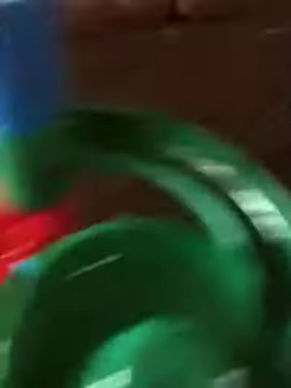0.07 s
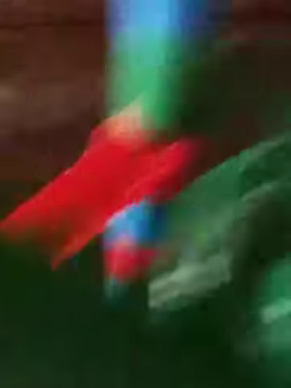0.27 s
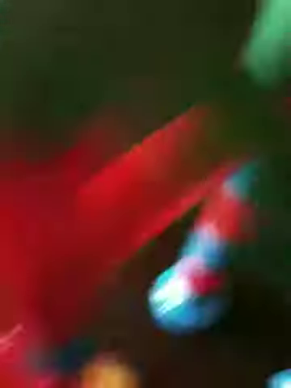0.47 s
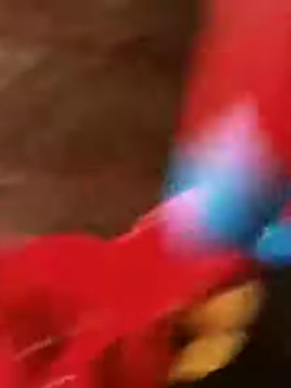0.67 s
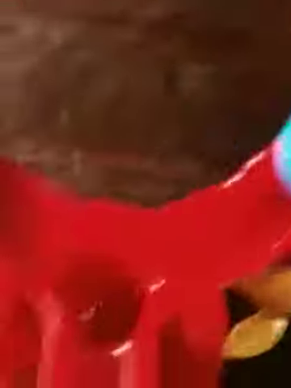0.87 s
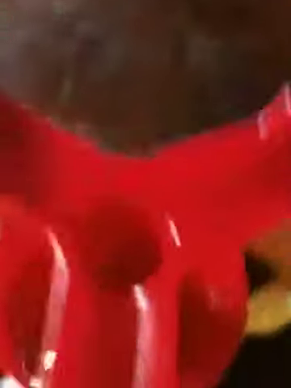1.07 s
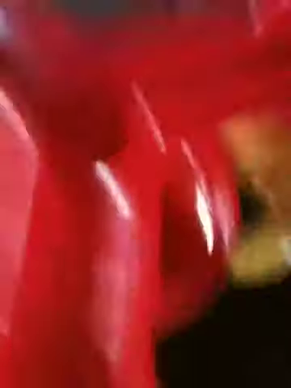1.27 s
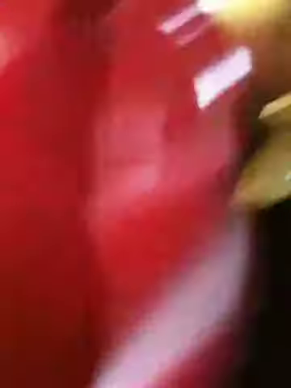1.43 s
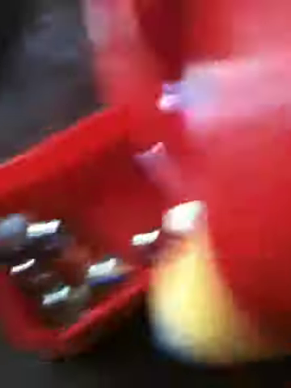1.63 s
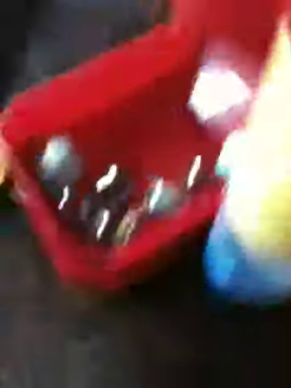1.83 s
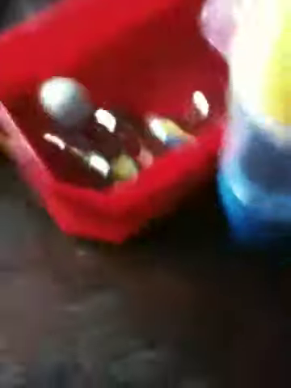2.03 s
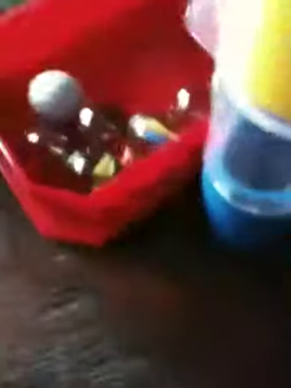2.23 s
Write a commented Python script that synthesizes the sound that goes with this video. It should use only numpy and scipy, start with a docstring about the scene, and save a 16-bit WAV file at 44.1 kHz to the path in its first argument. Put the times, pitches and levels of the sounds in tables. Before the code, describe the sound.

Marbles clack sharply along a plastic marble run, drop into a chute and roll briefly, then crash into a tray of other marbles. A few light clicks follow, heard close by in a quiet room.

```python
"""A knock's ring fades, then marbles roll and knock along the upper track of a plastic marble run,
close by in an ordinary room. They drop into a chute, roll along it and crash into a tray of marbles;
a few last clicks follow. Rolling is a stream of tiny bumps stirring the plastic's resonances.
Each knock is a glassy crack, then the struck part rings. The hardest knocks overload the microphone."""
import sys
import numpy as np
from scipy import signal
from scipy.io import wavfile

SR = 44100
rng = np.random.default_rng(int(sys.argv[2]) if len(sys.argv) > 2 else 0)


def persist_wave(psi):
    """Save psi, clipped to +-1, as 16-bit WAV."""
    counts = np.round(np.clip(psi, -1, 1) * 32767).astype(np.int16)
    wavfile.write(sys.argv[1], SR, np.atleast_2d(counts).T)


N = 105840
TIME_S = np.arange(N) / SR
EDGES_HZ = np.geomspace(40, 18000, 25)
CENTRES_HZ = np.sqrt(EDGES_HZ[1:] * EDGES_HZ[:-1])


def from_db(db):
    """Decibels to gain."""
    return 10 ** (np.asarray(db) / 20)


def unit_rms(x):
    """Scale to unit power."""
    return x / np.sqrt(np.mean(x ** 2) + 1e-20)


def at_hz(points, hz):
    """Read a table on a log-frequency axis."""
    points_hz, values = np.transpose(points)
    return np.interp(np.log(hz), np.log(points_hz), values)


def butterworth(x, hz, kind, order=2):
    """Causal Butterworth filter."""
    return signal.sosfilt(signal.butter(order, hz, kind, fs=SR, output="sos"), x)


def noise_bands():
    """White noise in roughly third-octave bands, neighbours uncorrelated."""
    white = rng.standard_normal((2, N))
    return np.array([butterworth(white[k % 2], EDGES_HZ[k:k + 2], "band")
                     for k in range(len(CENTRES_HZ))])


def band_gains(spectrum):
    """Gains that give the noise bands this spectrum at unit power."""
    gain = from_db(at_hz(spectrum, CENTRES_HZ))
    return gain / np.sqrt(np.sum(gain ** 2 * np.diff(EDGES_HZ)) * 2 / SR)


def decays(t60_s, t):
    """One exponential envelope per decay time."""
    return np.exp(-np.log(1000) * t / np.asarray(t60_s)[:, None])


# Background spectrum: freq_hz, relative_density_db
BACKGROUND_SPECTRUM = [(30, -22), (100, -4), (190, 1.5), (400, -6.5), (1000, -13.5), (4000, -19),
                       (15000, -23)]


def background(level_db):
    """Faint steady noise, strongest in the bass."""
    return from_db(level_db) * band_gains(BACKGROUND_SPECTRUM) @ noise_bands()


def rolling(envelope, resonances, bumps_per_s=7600, spread_db=1, flutter_db=1.6, flutter_hz=45):
    """A rolling marble meets many tiny soft bumps, which stir the plastic's resonances."""
    hits = rng.random(N) < bumps_per_s / SR
    bumps = hits * rng.standard_normal(N) * from_db(spread_db * rng.standard_normal(N))
    soft_bumps = butterworth(bumps + 1e-18, 6500, "low")
    rumble = np.zeros(N)
    for k, (hz, width_hz, gain_db) in enumerate(resonances):
        resonator = signal.iirpeak(hz, hz / width_hz, fs=SR)
        rumble += (-1) ** k * from_db(gain_db) * signal.lfilter(*resonator, soft_bumps)
    flutter = unit_rms(butterworth(rng.standard_normal(N), flutter_hz, "low"))
    level_db = np.interp(TIME_S, *np.transpose(envelope), left=-np.inf, right=-np.inf)
    return unit_rms(rumble) * from_db(level_db + flutter_db * flutter)


# Fading ring, then rolling, on the track: time_s, level_db
TRACK_ENVELOPE = [(0, -29), (.04, -40), (.1, -46), (.13, -39.5), (.16, -48), (.2, -58), (.3, -35),
                  (.42, -34.5), (.46, -64)]
# Track resonances: freq_hz, width_hz, gain_db
TRACK_RESONANCES = [(205, 36, -4.5), (781, 48, -3.5), (1150, 47, -6.5), (1434, 70, -2.5), (2030, 190, 0),
                    (2327, 107.5, -1.5), (2830, 390, -4.5), (3230, 130, -2.5), (3960, 980, -13)]


def track_ring_and_roll():
    """A knock's ring fades at the start, then rolling stirs the track in uneven surges."""
    return rolling(TRACK_ENVELOPE, TRACK_RESONANCES)


def ring_up(hz, t, rise_cycles=1.18):
    """The plastic rings up over a few cycles, so the treble arrives first."""
    return 1 - np.exp(-t * hz[:, None] / rise_cycles)


def contact_tilt_db(hz, body_db, treble_db, body_hz=1160, body_width_oct=0.76):
    """Where a knock lands sets its hollow body; contact hardness sets its treble."""
    body = np.exp(-(np.log2(hz / body_hz) / body_width_oct) ** 2)
    return body_db * body + at_hz([(2900, 0), (7300, treble_db)], hz)


# Glassy crack of the contact: freq_hz, relative_density_db
CRACK_SPECTRUM = [(1500, -33), (4000, -2.5), (8000, -4), (15000, -1.5)]
# Decay of the plastic's dense modes: freq_hz, base_t60_s
CLOUD_DECAY = [(150, 0.11), (1000, 0.049), (3000, 0.045), (6000, 0.041), (14000, 0.026)]


def knocks(events, modes, cloud_spectrum, crack_db, cloud_db, ring_db, cloud_t60_scale=1.0):
    """Each knock cracks, then rings the struck spot, the main modes and a cloud of dense, brief ones."""
    crack_t60_s, spot_t60_s = 0.0028, 0.055
    scatter_db, detune_ratio = 2.5, 0.015
    t = TIME_S[:SR // 5]
    mode_hz, mode_db, mode_t60_s = np.transpose(modes)
    bands = np.pad(noise_bands(), ((0, 0), (0, len(t))))
    crack = band_gains(CRACK_SPECTRUM) @ bands
    cloud = bands * band_gains(cloud_spectrum)[:, None]
    crack_fade, spot_fade = decays([crack_t60_s, spot_t60_s], t)
    mode_fade = decays(mode_t60_s, t) * ring_up(mode_hz, t)
    cloud_fade = decays(cloud_t60_scale * at_hz(CLOUD_DECAY, CENTRES_HZ), t) * ring_up(CENTRES_HZ, t)
    out = np.zeros(N + len(t))
    for start_s, level_db, body_db, treble_db, spot_hz, spot_db in events:
        start = int(start_s * SR)
        span = slice(start, start + len(t))
        scatter, detune, phase = rng.standard_normal((3, len(mode_hz)))
        detuned_hz = mode_hz * (1 + detune_ratio * detune)
        rings = np.sin(2 * np.pi * (detuned_hz[:, None] * t + phase[:, None]))
        mode_tilt_db = contact_tilt_db(mode_hz, body_db, treble_db)
        cloud_tilt_db = contact_tilt_db(CENTRES_HZ, body_db, treble_db)
        knock = from_db(crack_db + treble_db) * crack[span] * crack_fade
        knock += from_db(spot_db) * np.sin(2 * np.pi * spot_hz * t) * spot_fade
        knock += from_db(ring_db + mode_db + scatter_db * scatter + mode_tilt_db) @ (rings * mode_fade)
        knock += from_db(cloud_db + cloud_tilt_db) @ (cloud[:, span] * cloud_fade)
        out[span] += from_db(level_db) * knock
    return out[:N]


# Track impacts: start_s, level_db, body_db, treble_db, spot_hz, spot_db
TRACK_HITS = [(.1065, -25.5, 2, -6.5, 2253, -5.5), (.1685, -19, -11.5, -10, 3160, -4),
              (.2135, -1.5, -11, -2.5, 2530, -8.5), (.2438, -10, -4, 4, 2310, -3.5),
              (.2815, -13, 8.5, 2, 3636, -2), (.288, -11, 0.5, 3.5, 2100, 2.5),
              (.3043, -6.5, -11, 2.5, 3643, 3.5), (.3125, -6.5, -1.5, -2, 3855, -2.5),
              (.3235, -9, -9.5, 2.5, 3650, -2.5), (.330, -11, -14, -6.5, 3140, -1.5),
              (.3615, -18, 2, 1, 3226, 6.5), (.381, -23, 3, 10.5, 2540, 5), (.402, -24, 4.5, -7, 2380, 1)]
# Main track modes: freq_hz, level_db, t60_s
TRACK_RINGING = [(755, -18, .05), (1554, -13, 0.093), (1993, -13.5, .045), (2400, -7, 0.038),
                 (3260, -9, .045), (3680, -7, 0.058), (4480, -7.5, .028), (6650, -16, 0.047)]
# Dense track modes: freq_hz, relative_density_db
TRACK_CLOUD = [(100, -28), (220, -22), (500, -31.5), (1200, -8), (1800, 2), (2800, -2), (3600, 1),
               (4400, -4), (5700, -13.5), (7000, -12), (9000, -15.5), (15000, -25)]


def track_knocks():
    """Marbles strike the upper track and ring its plastic."""
    return knocks(TRACK_HITS, TRACK_RINGING, TRACK_CLOUD, crack_db=-27, cloud_db=-0.5, ring_db=0)


# Chute impacts: start_s, level_db, body_db, treble_db, spot_hz, spot_db
CHUTE_HITS = [(.4633, -4.5, -8, 0.5, 3128, 1.5), (.4835, -14.5, -3, -0.5, 2370, -2),
              (.5122, -11.5, -1.5, 1.5, 1253, -9.5), (.5148, -6, 0.5, -6, 3084, -3.5),
              (.5205, -11, -3.5, -16, 2940, -3.5), (.537, -25, -2.5, -0.5, 2720, 2),
              (.5825, -11.5, 2, -4.5, 3014, 0.5), (.589, -16.5, -6, -17, 2590, -0.5),
              (.6192, -10.5, 4, -1.5, 1116, 0), (.645, -23, 7, -7, 1070, -1),
              (.775, -46, 11.5, -25, 1243, 10.5), (.9435, -31.5, 2.5, -17, 2205, -2.5),
              (1.096, -17.5, 4.5, 2.5, 2330, -3.5), (1.119, -9, -9, -6.5, 3510, -2),
              (1.122, -18, -7, -4, 2266, 2.5)]
# Main chute modes: freq_hz, level_db, t60_s
CHUTE_RINGING = [(1079, -11.5, .045), (1229, -13, 0.096), (1787, -15.5, 0.091), (2346, -16, .07),
                 (2740, -9, 0.0447), (2940, -12.5, 0.073), (3105, -9.5, 0.055), (3335, -14.5, 0.099),
                 (4605, -14.5, 0.081)]
# Dense chute modes: freq_hz, relative_density_db
CHUTE_CLOUD = [(100, -36.5), (220, -24), (600, -18), (1150, -4), (1500, -4.5), (2400, -2), (3100, 3),
               (3900, -6), (5500, -9), (9000, -15), (15000, -24.5)]


def chute_knocks():
    """Marbles drop into the chute and ring it, with a sharper crack."""
    return knocks(CHUTE_HITS, CHUTE_RINGING, CHUTE_CLOUD, crack_db=-16, cloud_db=-1.5, ring_db=1.5)


# Rolling in the chute: time_s, level_db
CHUTE_ENVELOPE = [(.6, -52.5), (.66, -48), (.76, -54.5), (.778, -43.5), (.83, -46.5), (.91, -52.5),
                  (.96, -39.5), (1.01, -51.5), (1.035, -39), (1.08, -47.5), (1.16, -61.5)]
# Resonances it stirs: freq_hz, width_hz, gain_db
CHUTE_RESONANCES = [(194, 27, -6.5), (540, 80, -4), (740, 69, -6), (980, 28, 1), (1177, 87, 6),
                    (1239, 22, 8), (1620, 400, -14.5), (2270, 180, -5), (3000, 620, -16.5),
                    (5960, 3400, -33)]


def chute_roll():
    """Rolling stirs the chute, most strongly near 1.2 kHz."""
    return rolling(CHUTE_ENVELOPE, CHUTE_RESONANCES)


# Faint glassy ticks on the way: start_s, level_db, body_db, treble_db, spot_hz, spot_db
CHUTE_TICKS = [(.984, -45.5, -9.5, 2, 5260, -6), (1.051, -49.5, -1.5, 11, 2293, -6)]
# Clicks in the tray: start_s, level_db, body_db, treble_db, spot_hz, spot_db
TRAY_CLICKS = [(1.563, -42.5, 6, -10, 1090, -5.5), (1.5902, -23, -2, -0.5, 2244, -3),
               (1.622, -22, -3, -5.5, 1764, -4.5), (1.675, -39.5, -2.5, -16, 2290, -15),
               (1.806, -29.5, -3, -2.5, 2230, -10), (1.838, -40, 6, 3, 1060, -3.5),
               (1.957, -51, 0, 0, 2000, -6), (1.9783, -33.5, 2, 6, 3690, -3),
               (1.9882, -24, -6, 8, 2148, -5.5), (1.9947, -29, -5.5, -27, 1908, 2.5),
               (2.071, -44.5, 1, 4, 3710, -5), (2.2527, -32.5, -2, 0.5, 1980, -9.5)]
# Main click modes: freq_hz, level_db, t60_s
CLICK_RINGING = [(1066, -7.5, 0.031), (1800, -11.5, 0.024), (2200, -11.5, 0.039), (2924, -9, .022),
                 (3480, -13, .02), (4452, -15, 0.025)]
# Dense click modes: freq_hz, relative_density_db
CLICK_CLOUD = [(100, -18), (750, -12), (1100, -3), (1400, 7.5), (2000, 3), (3800, 1), (5500, -12.5),
               (7000, -6.5), (10000, -16), (15000, -45)]


def marble_clicks():
    """Marbles touch each other while rolling, and again as they settle in the tray."""
    return knocks(CHUTE_TICKS + TRAY_CLICKS, CLICK_RINGING, CLICK_CLOUD,
                  crack_db=-18, cloud_db=-3, ring_db=3, cloud_t60_scale=1.065)


# Tray impacts: start_s, level_db, body_db, treble_db, spot_hz, spot_db
TRAY_HITS = [(1.1837, -6.5, -7, -12, 2255, -9.5), (1.1885, 0, 4.5, 6.5, 1747, -4.5),
             (1.1955, -9, -2.5, -2, 2755, -4), (1.201, -8, 2, -3.5, 1113, -1.5),
             (1.208, -10.5, -4, -3, 3200, 0.5), (1.2217, -10.5, -8, -5.5, 2480, 2.5),
             (1.232, -17.5, 4.5, 0, 2120, -1), (1.256, -12, -3, -8, 2270, 0),
             (1.2765, -5.5, 5, -2, 1848, -3.5), (1.3082, -5.5, 2.5, -3.5, 2400, -11),
             (1.329, -13, -7, -3, 2900, -7), (1.341, -15, -2, -7.5, 2880, -4.5),
             (1.418, -34.5, -15, -9, 2290, -0.5), (1.454, -30, -3.5, -28, 2280, -5),
             (1.488, -34, -15, -25, 2320, -2.5)]
# Main tray modes: freq_hz, level_db, t60_s
TRAY_RINGING = [(1032, -14.5, 0.14), (1125, -10, 0.06), (1792, -19, 0.018), (2010, -14, .055),
                (2228, -12, 0.064), (2739, -12, 0.055), (3214, -18, 0.031), (3690, -21.5, 0.05),
                (4198, -10, .045)]
# Dense tray modes: freq_hz, relative_density_db
TRAY_CLOUD = [(100, -32.5), (250, -24), (450, -23.5), (800, -11.5), (1050, -4), (1400, -3.5), (2200, 10),
              (4200, 2.5), (5600, -2.5), (9000, -6.5), (15000, -18.5)]


def tray_crash():
    """Marbles land among those in the tray; a burst of knocks rings it."""
    return knocks(TRAY_HITS, TRAY_RINGING, TRAY_CLOUD,
                  crack_db=-27, cloud_db=-2, ring_db=0.5, cloud_t60_scale=1.1)


# Room decay: freq_hz, t60_s
REVERB_DECAY = [(150, 0.15), (500, 0.51), (2000, 0.47), (6000, .5), (14000, 0.33)]
# Tail level before the wall-echo swell: freq_hz, gain_db
REVERB_SEND = [(150, -1), (500, -14), (1500, -15), (4000, -16.5), (12000, -23)]


def room(x, delay_s=0.0093, build_s=0.0034, echo_s=0.008, echo_width_s=0.0067, echo_db=11.5):
    """A diffuse tail builds up briefly, swells with the first wall echoes and dies away."""
    t60_s = at_hz(REVERB_DECAY, CENTRES_HZ)
    gains = from_db(at_hz(REVERB_SEND, CENTRES_HZ)) * np.sqrt(2 * np.log(1000) / (t60_s * SR))
    tail = gains @ (noise_bands() * decays(t60_s, TIME_S))
    onset = np.clip((TIME_S - delay_s) / build_s, 0, 1)
    wall_swell = from_db(echo_db * np.exp(-((TIME_S - echo_s) / echo_width_s) ** 2))
    return signal.fftconvolve(x, tail * onset * wall_swell)[:N]


def scene():
    """Knocks, clicks and rolling in a quiet room."""
    impacts = track_knocks() + chute_knocks() + tray_crash() + marble_clicks()
    run = impacts + track_ring_and_roll() + chute_roll()
    return (run + background(level_db=-66.5) + room(run))[None]


def record(dry):
    """The small microphone loses bass and overloads on the hardest knocks; rumble and top are cut."""
    bass_hz, coupling_hz, top_hz = 136, 70, 16000
    clip_level = 0.71
    thin = butterworth(dry, bass_hz, "high")
    clipped = thin / (1 + (thin / clip_level) ** 6) ** (1 / 6)
    coupled = butterworth(clipped, coupling_hz, "high", order=1)
    return signal.sosfiltfilt(signal.butter(16, top_hz, fs=SR, output="sos"), coupled)


dry = scene()
out = record(dry)
persist_wave(out)
```